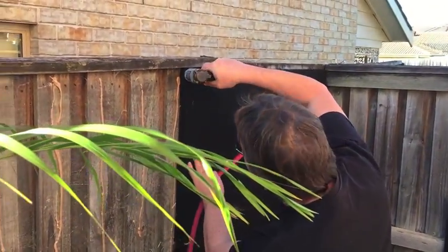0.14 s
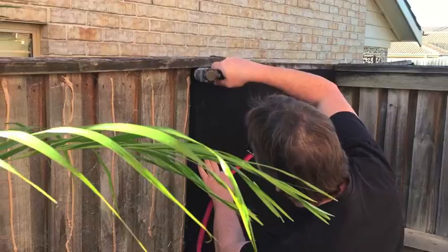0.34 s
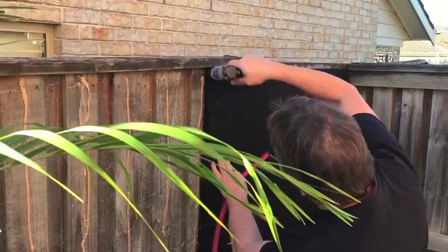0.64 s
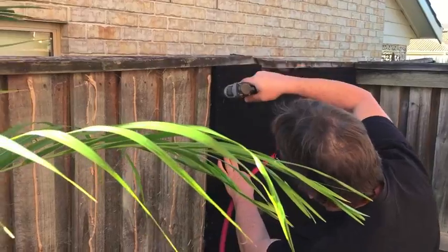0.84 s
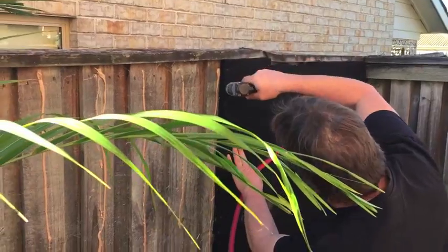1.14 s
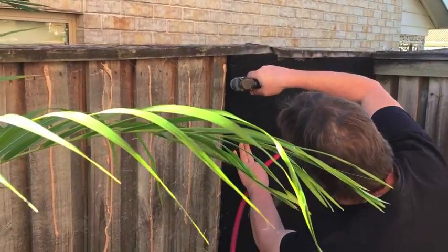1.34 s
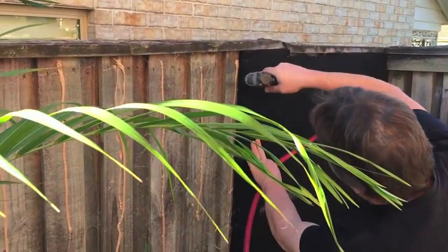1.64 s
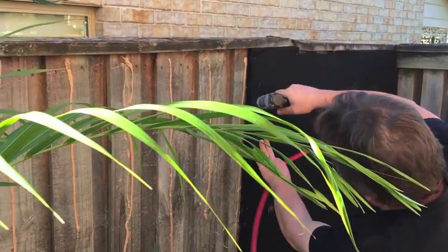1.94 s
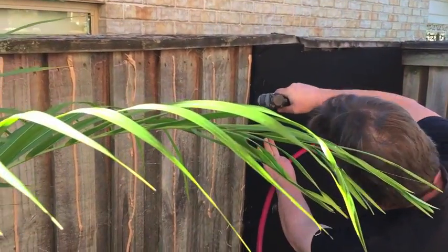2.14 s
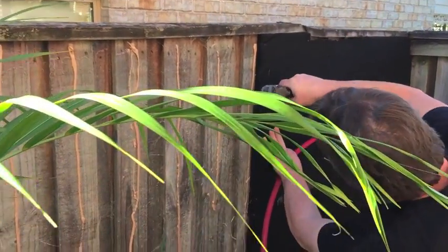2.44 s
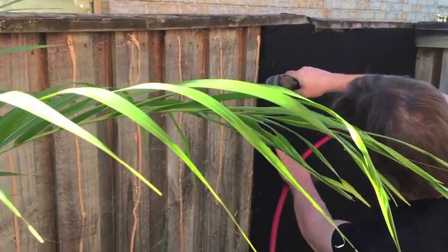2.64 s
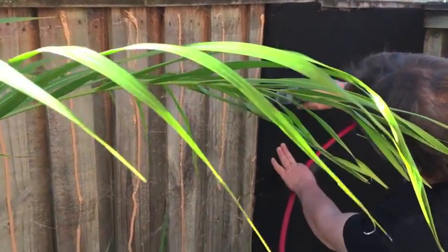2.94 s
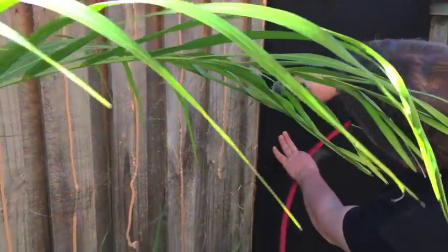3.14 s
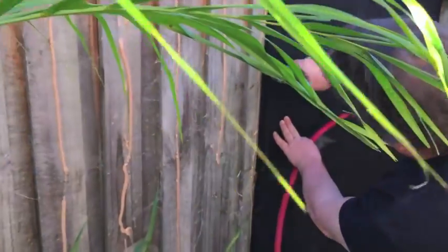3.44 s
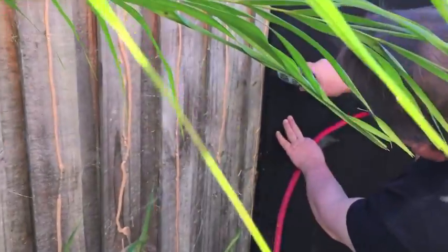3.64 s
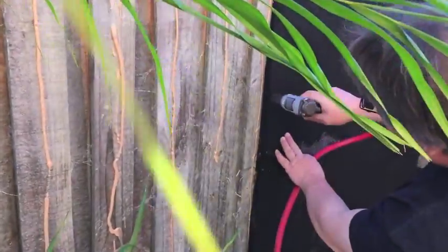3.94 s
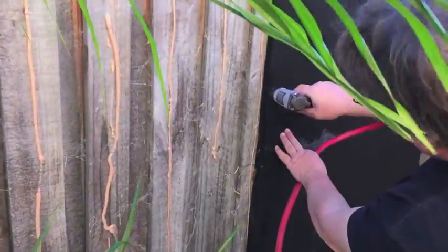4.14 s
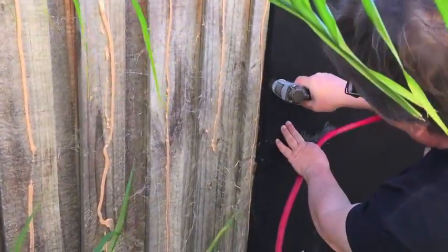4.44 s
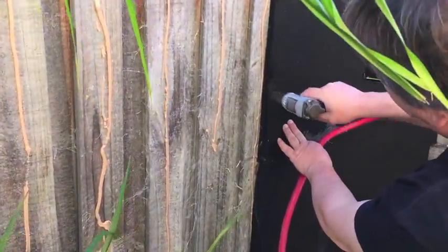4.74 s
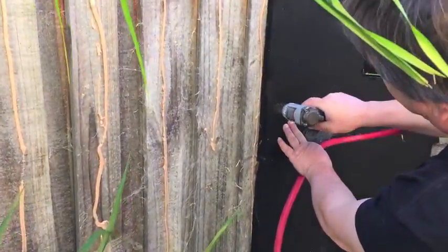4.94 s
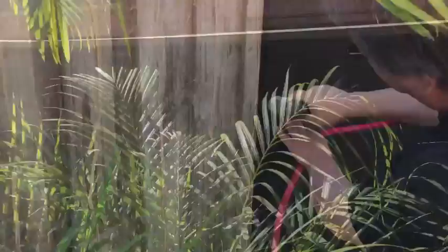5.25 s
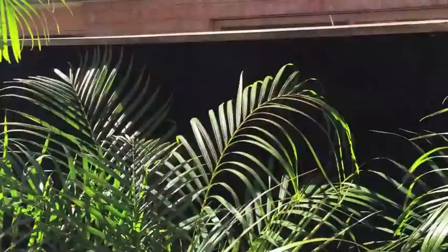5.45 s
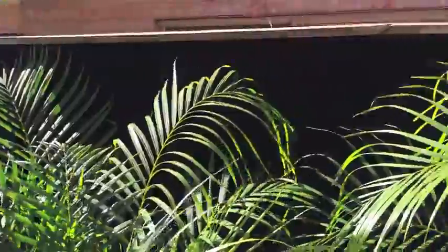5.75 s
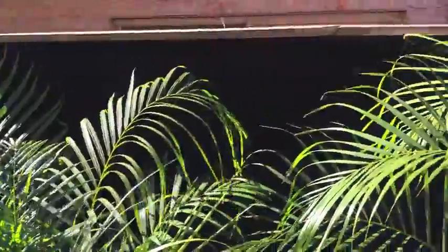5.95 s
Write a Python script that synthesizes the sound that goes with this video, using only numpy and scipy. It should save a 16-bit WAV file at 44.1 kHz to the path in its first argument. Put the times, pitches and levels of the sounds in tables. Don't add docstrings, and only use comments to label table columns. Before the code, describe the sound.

Five hard staple-gun shots dominate, each a double event: a cracking blow that rings the planks, then, a fifth of a second later, a clattering burst of released air. Between them are quiet scuffs, taps and leaf rustles, with low traffic behind. Short echoes return from fences and walls. After the last shot come small metal chinks, a short low motor chug and faint bird notes. Near microphone, outdoors.

```python
import sys
import numpy as np
from scipy import signal
from scipy.io import wavfile
from scipy.ndimage import uniform_filter1d, map_coordinates

SR = 44100
rng = np.random.default_rng(int(sys.argv[2]) if len(sys.argv) > 2 else 0)


def convert_level_to_amplitude(level_db):
    exponent = np.asarray(level_db, float) / 20
    return 10 ** exponent


def store_pcm(level_fs):
    pcm = np.round(np.clip(level_fs, -1, 1) * 32767).astype(np.int16)
    wavfile.write(sys.argv[1], SR, np.atleast_2d(pcm).T)


N = 268965


def evened(x):
    return x / np.sqrt(np.mean(x ** 2) + 1e-20)


def smooth_noise(count, size):
    return evened(uniform_filter1d(rng.standard_normal(count), size=size))


def read(points, hz):
    f, value = np.transpose(points)
    return np.interp(np.log(hz + 1), np.log(f + 1), value)


def level(points):
    s, db = np.transpose(points)
    return convert_level_to_amplitude(np.interp(np.arange(N) / SR, s, db))


def add(mix, s, sound):
    part = mix[round(s * SR):][:len(sound)]
    part += sound[:len(part)]


def above(x, hz):
    return signal.sosfilt(signal.butter(N=4, Wn=hz / (SR / 2), btype="high", output="sos"), x)


def swell(count, rise, t60, hold=0.):
    t = np.arange(count) / SR
    return (1 - np.exp(-t / rise)) * convert_level_to_amplitude(-60 * np.maximum(t - hold, 0) / t60)


def hiss(colour, count, t60=None, patchy_db=0., size=128):
    frames, hz = 4 * count // size + 5, np.fft.rfftfreq(size, 1 / SR)
    a, b, patches = rng.standard_normal((frames, len(hz), 3)).T
    patches = uniform_filter1d(patches, size=5, axis=0)
    patches = evened(uniform_filter1d(patches, size=7, axis=1))
    shape = convert_level_to_amplitude(read(colour, hz))[:, None]
    z = (a + 1j * b) * shape * convert_level_to_amplitude(patchy_db * patches)

    def to_sound(v):
        return signal.istft(v, nperseg=size, noverlap=3 * size // 4)[1][:count]

    rms = np.std(to_sound(z))
    if t60:
        t = np.arange(frames) * size / 4 / SR
        z = z * convert_level_to_amplitude(-60 * t / read(t60, hz)[:, None])
    return to_sound(z) / rms


def ring(modes, t60, rough, hold=0., count=12000):
    t, out = np.arange(count) / SR, 0
    clear = np.exp(-(t / .028) ** 2)
    for hz, width, db in modes:
        r = np.exp(-np.pi * np.clip(2 * width, 90, 400) / SR)
        a, b = signal.lfilter([1], [1, -2 * r, r * r], rng.standard_normal((2, 2 * count)))[:, count:]
        waver = clear + rough * (1.12 - clear) * (a + .4j * b) / np.std(a)
        tone = waver * np.exp(2j * np.pi * (hz * t + rng.random()))
        fall = convert_level_to_amplitude(db - 60 * np.maximum(t - hold, 0) / read(t60, hz))
        out = out + fall * np.sqrt(np.clip(width, 30, 250)) * tone.real
    return out / np.std(out[:700])


def thump(hz, cycles, count=8000):
    u = np.arange(count) / SR * hz
    return np.sqrt(2) * np.sin(2 * np.pi * u) * (1 - np.exp(-u / 0.55)) * np.exp(-u / cycles)


def pop(count=2500):
    t = np.arange(count) / SR
    clack = np.exp(-t / 0.00027) * np.sin(2 * np.pi * 950 * t) * 0.19
    return clack - np.exp(-t / 0.00089) * np.sin(2 * np.pi * 150 * t)


def touch(s, db, hz, width, t60, rise):
    share = width / hz
    colour = [(hz / (1 + 2.5 * share), -30), (hz / (1 + .6 * share), -4), (hz, 0),
              (hz + width / 2, -4), (hz + 1.5 * width, -30), (8 * hz, -75)]
    return s, convert_level_to_amplitude(db) * hiss(colour, count=6000, patchy_db=1, size=256) * swell(6000, rise, t60)


def touches(mix, rows, share, t60, rise):
    for s, db, hz in rows:
        add(mix, *touch(s, db, hz, share * hz, t60, rise))


def chink(s, db, hz, t60, rise):
    t = np.arange(3000) / SR
    return s, convert_level_to_amplitude(db + 2) * np.sin(2 * np.pi * hz * t) * swell(3000, rise, t60, 0.003)


# pitch_hz, level_db
TRAFFIC_COLOUR = [(12, -51.5), (20, -22), (41, -3), (92, 4), (157, -5), (198, -9.5), (248, -13),
                  (433, -23.5), (528, -30), (600, -20.5), (780, -46), (1320, -120)]
AIR_COLOUR = [(180, -40.5), (300, -6.5), (511, -12), (565, -16), (885, -9), (1060, -10.5), (1690, -12.5),
              (16000, -28.5)]
LEAF_COLOUR = [(2500, -32), (6000, -5), (9000, -1.5), (13000, -5.5), (16000, -3.5)]
# time_s, level_db
TRAFFIC_LEVEL = [
    (0, -63.5),
    (.5, -59),
    (2., -62),
    (3., -60),
    (4.3, -59),
    (4.9, -64.5),
    (5.2, -52),
    (5.45, -72),
    (5.6, -66.5),
    (6.1, -62.5),
]
# time_s, level_db
LEAF_STIR = [(0, -84.5), (.4, -81), (.9, -86.5), (1.4, -80), (2.1, -85), (2.5, -79.5), (2.9, -69.5),
             (3.5, -78), (4.1, -72), (4.4, -73.5), (4.95, -80), (5.4, -81), (6.1, -80)]
# middle_s, length_s, level_db
FROND_SWISHES = [
    (3.22, 0.086, -66),
    (3.306, .1, -70),
    (4.134, 0.038, -54.5),
    (4.22, 0.17, -59),
]


def background():
    stir = level(LEAF_STIR)
    rustle, air = stir.copy(), convert_level_to_amplitude(-70.5) + convert_level_to_amplitude(5) * stir
    for s, length, db in FROND_SWISHES:
        add(rustle, s - length / 2, convert_level_to_amplitude(db) * np.hanning(round(length * SR)))
    rumble = level(TRAFFIC_LEVEL) * convert_level_to_amplitude(3.5) * hiss(TRAFFIC_COLOUR, count=N, patchy_db=-0.2, size=2048)
    breeze = air * convert_level_to_amplitude(-5.0) * hiss(AIR_COLOUR, count=N, patchy_db=1.5, size=512)
    leaves = rustle * convert_level_to_amplitude(-2.5) * hiss(LEAF_COLOUR, count=N, patchy_db=5.5, size=256)
    return rumble + breeze + leaves


# start_s, level_db, pitch_hz
GRIT_TICKS = [(.162, -60, 2600), (.18, -52, 1500), (.181, -60, 4200), (.238, -66, 3000), (0.306, -68, 1500),
              (.337, -55.5, 2100), (.366, -60, 2900), (4.277, -52, 3500), (5.0726, -52, 1850),
              (5.0778, -44, 1750), (5.082, -52, 1400), (5.088, -54, 8400), (5.096, -55, 3940)]


def grit(mix):
    touches(mix, GRIT_TICKS, share=0.65, t60=0.016, rise=.0004)


# start_s, level_db, pitch_hz
HAND_SCUFFS = [(.163, -62, 3808), (.175, -54, 1290), (.305, -62, 1308), (.33, -59.5, 1588),
               (1.0196, -58, 3500), (1.3111, -62, 900), (1.4317, -60.5, 3220), (2.2998, -57.5, 1092),
               (3.1092, -62, 3502), (3.384, -60.5, 1100), (3.492, -55, 2986), (4.298, -57, 1157),
               (4.362, -60, 1400), (4.429, -63.5, 3377), (5.194, -62, 1570), (5.208, -58, 4330),
               (5.418, -62, 4305), (4.245, -61.5, 2470)]


def scuffs(mix):
    touches(mix, HAND_SCUFFS, share=0.7, t60=0.096, rise=0.0023)


# start_s, level_db, pitch_hz
STRUCK_NOTES = [(.177, -57, 1490), (.179, -58, 1050), (.332, -62, 1310), (.334, -59.5, 2040),
                (2.3, -65, 1110), (2.302, -64.5, 2140), (4.3, -61, 1400), (4.303, -49.5, 379),
                (4.357, -61.5, 2950), (4.362, -68, 1367), (4.368, -62, 420), (4.43, -64, 3200),
                (4.431, -64, 3740), (5.075, -48, 1253), (5.076, -48, 1610), (5.075, -45.5, 2010),
                (5.076, -54, 3670), (5.076, -51, 4270), (5.208, -64, 4700), (5.207, -62, 2950),
                (5.194, -63, 1260), (5.258, -49, 650), (5.28, -50, 1280)]


def struck_notes(mix):
    for row in STRUCK_NOTES:
        add(mix, *chink(*row, t60=0.054, rise=.0015))


# start_s, level_db, pitch_hz
LIGHT_TICKS = [
    (.36, -61, 3720),
    (3.953, -49.5, 6400),
    (3.9535, -46, 2800),
    (4.162, -54, 1993),
    (4.276, -50.5, 5600),
    (4.2765, -50, 2670),
    (4.269, -59.5, 3000),
    (4.972, -63, 6800),
    (4.9945, -54, 5630),
    (4.995, -51.5, 2710),
]


def light_ticks(mix):
    touches(mix, LIGHT_TICKS, share=0.23, t60=0.018, rise=0.000515)


# start_s, level_db, pitch_hz
TRIGGER_CLICKS = [
    (.472, -44.5, 9850),
    (.478, -44, 9000),
    (1.4908, -33, 11000),
    (1.495, -32, 6945),
    (2.5095, -39, 8860),
    (2.515, -37, 7013),
    (3.5075, -40.5, 2486),
    (3.511, -40, 5960),
    (4.5575, -38.5, 8950),
    (4.56, -41, 5500),
]


def trigger(mix):
    touches(mix, TRIGGER_CLICKS, share=1.5, t60=0.016, rise=.0003)


# pitch_hz, level_db
PUFF_COLOUR = [(120, -33.5), (200, -1.5), (1710, -13.5), (2860, -3), (4770, -10.5), (6280, 0.5), (7970, -7),
               (11500, -6), (16000, -7)]
LEAK_COLOUR = [(1500, -30), (4000, -4.5), (7000, 1.5), (11000, -7.5), (16000, -15)]
# valve_opens_s, puff_db, nose_burst_db
VALVE_OPENINGS = [
    (0.4829, -23.5, -24.5),
    (1.4978, -24, -29),
    (2.517, -23, -24.5),
    (3.5123, -22.5, -24),
    (4.5629, -22, -24),
]


def valve(s, puff_db, nose_db, strike_s):
    out = np.zeros(4000)
    add(out, .002, convert_level_to_amplitude(puff_db - 12) * hiss(LEAK_COLOUR, count=400) * swell(400, 0.0022, 0.038))
    puff = swell(1500, .0012, .03, .0045) + convert_level_to_amplitude(-13) * swell(1500, .003, .2)
    add(out, .005, convert_level_to_amplitude(puff_db + 2.5) * above(hiss(PUFF_COLOUR, count=1500, patchy_db=0.5), 880) * puff)
    add(out, .008, convert_level_to_amplitude(puff_db - 0.5) * pop())
    burst = hiss(LEAF_COLOUR, count=2500) * swell(2500, .0004, 0.059, .003)
    add(out, 0.0044 + strike_s - s, convert_level_to_amplitude(nose_db) * burst)
    return s - .005, out


# start_s, ring_db, crack_db, crash_db
SHOT_BLOWS = [
    (0.498, -8, -8.5, -7),
    (1.5113, -12, -8, -6),
    (2.5303, -9.5, -7, -5),
    (3.527, -7, -7.5, -3.5),
    (4.578, -10, -7.5, -5.5),
]
# pitch_hz, level_db
PLANK_MODES = [
    [(400, -15), (624, -14.5), (1050, -8), (1255, -2.5), (1370, 1.5), (1710, -9.5), (1850, -11),
     (1990, -5.5), (2380, -12.5), (2650, -9), (2920, -11.5), (3300, -12), (3550, -2.5), (4050, -5.5)],
    [(316, -0.5), (615, 1), (935, -5), (1250, -0.5), (1480, 2), (1890, 2), (2330, -7), (2650, -8),
     (2960, -9), (3300, -14.5), (3600, -15), (3910, -12.5)],
    [(355, -1.5), (644, -1), (918, -1.5), (1153, 0), (1260, -3.5), (1560, -6), (1960, -9.5), (2230, -8),
     (2570, -5.5), (2850, -5.5), (3270, -8.5), (3450, -3), (3990, -6), (4150, -7.5)],
    [(363, -3), (662, -7.5), (1140, -5), (1340, 2.5), (1550, -4), (2030, -11.5), (2210, -9), (2700, -11.5),
     (2950, -13), (3380, -14.5), (3630, -9.5), (3960, -10), (4270, -12)],
    [(199.3, -2), (299.3, -4.5), (460, -5), (921, -2.5), (1135, -5.5), (1360, 0), (1637, -7), (1950, -6),
     (2240, -6), (2700, -8), (3040, -16.5), (3320, -9), (3580, -4), (4250, -8)],
]
# pitch_hz, t60_s
WOOD_FALL = [(200, 0.06), (330, .06), (620, 0.035), (1300, .08), (2500, 0.058), (4000, 0.06)]
# pitch_hz, level_db
CRASH_COLOUR = [(100, -14.5), (300, -6), (1000, -0.5), (2200, -5.5), (3500, -13), (5000, -15.5),
                (9000, -18.5), (12700, -22.5), (16000, -29)]
CRACK_COLOUR = [(800, -19.5), (3000, -3), (8000, -6), (16000, -14)]
# pitch_hz, t60_s
CRASH_FALL = [(100, 0.22), (1000, 0.14), (4000, 0.12), (9000, 0.044), (15000, 0.05)]
# pitch_hz, width_hz, level_db
BLADE_MODES = [(5500, 930, -3), (6870, 260, -1), (8630, 420, -4.5), (11000, 290, -11), (13260, 350, -5.5)]
# pitch_hz, t60_s
BLADE_FALL = [(5000, .014), (15000, .012)]


def crash_noise(patchy_db, rise, t60):
    return hiss(CRASH_COLOUR, count=9000, t60=CRASH_FALL, patchy_db=patchy_db) * swell(9000, rise, t60)


def shot(s, ring_db, crack_db, crash_db, plank):
    out = np.zeros(16000)
    press_s, let_go_db = .016, -7.5
    ringing_on = convert_level_to_amplitude(let_go_db) * swell(9000, 0.0013, 5.5)
    press = ringing_on + (1 - convert_level_to_amplitude(let_go_db)) * swell(9000, 0.003, 0.022, press_s)
    modes = [(hz, 58, db) for hz, db in plank]
    add(out, 0, convert_level_to_amplitude(ring_db + 0.5) * ring(modes, WOOD_FALL, 0.55, press_s, count=9000) * press)
    for after, db in ((0, -4), (.009, -7.5)):
        add(out, after, convert_level_to_amplitude(crash_db + db - 1.0) * above(crash_noise(3.0, 0.0004, 4.0), 150))
    add(out, 0, convert_level_to_amplitude(-36) * thump(84, 3.3))
    add(out, 0, convert_level_to_amplitude(ring_db - 17.0) * thump(195, 2.4))
    snap = swell(900, .0001, .012, .0008) + convert_level_to_amplitude(-12) * swell(900, .0005, .05)
    for after, db in ((.0026, 3.5), (.0062, -1.5)):
        add(out, after, convert_level_to_amplitude(crack_db + db) * hiss(CRACK_COLOUR, count=900) * snap)
        add(out, after, convert_level_to_amplitude(crack_db + db - 17.5) * ring(BLADE_MODES, BLADE_FALL, 0.32, count=1000))
    return s, out


# pitch_hz, level_db, t60_s
LINGER_MODES = [
    [(934, -2.5, 0.21), (1303, -0.5, 0.33), (1890, -14, 0.12), (2363, -11, 0.24), (3569, -3.5, 0.18),
     (4000, -10, 0.3)],
    [(930, -1.5, 0.16), (1491, -0.5, 0.22), (1860, 0, 0.16), (2320, -8, 0.24), (2510, -6, 0.17),
     (3620, -11.5, 0.2)],
    [(645, -7, 0.19), (904, -4.5, 0.074), (1593, -0.5, 0.086), (1992, -20.5, 0.34), (3494, 0.5, 0.07),
     (4172, -11.5, 0.15)],
    [(335, -11.5, 0.22), (980, -10.5, 0.16), (1340, -0.5, 0.082), (1922, -11.5, 0.16), (2751, -21.5, 0.16),
     (3908, -15.5, 0.13)],
    [(1273, 2, 0.075), (1550, -17.5, 0.25), (2300, -18.5, 0.17), (2697, -38.5, 5.0), (3591, -33, 5.0),
     (4040, -17.5, 0.16)],
]
LINGER_LEVEL = [-26, -30.5, -25, -24.5, -18.5]


def linger(s, level_db, modes):
    t, out = np.arange(9000) / SR, 0
    for hz, db, t60 in modes:
        beat = 1 + .6 * np.sin(2 * np.pi * (rng.uniform(15, 40) * t + rng.random()))
        tone = np.sin(2 * np.pi * (hz * t + rng.random()))
        out = out + convert_level_to_amplitude(db) * beat * tone * swell(9000, 0.0058, np.clip(t60, .05, .18), hold=0.031)
    return s, convert_level_to_amplitude(level_db) * out


# exhaust_opens_s, knock_db, leak_db, blast_db
EXHAUST_RELEASES = [
    (.677, -20.5, -46, -22.5),
    (1.6866, -20.5, -44.5, -21.5),
    (2.685, -21.5, -49, -22.5),
    (3.672, -21.5, -48.5, -22.5),
    (4.739, -21, -47.5, -22),
]
# pitch_hz, level_db
GUN_BODY = [
    [(301, -0.5), (990, -2), (1350, -3.5), (1680, -2.5), (2070, -8), (2620, 0.5), (2850, -3.5),
     (3210, -17.5), (3810, -2)],
    [(307, -4), (650, -11.5), (942, -7.5), (1380, -4.5), (1680, -1.5), (1850, -2), (2380, -13),
     (2620, -4.5), (2860, -6), (3650, -6)],
    [(307, -3.5), (840, -18), (1010, -2), (1470, -11.5), (1850, 3), (2480, -5), (2760, 1.5), (3340, -11),
     (3700, -8)],
    [(355, -4.5), (985, -3.5), (1330, -6.5), (1660, -5.5), (1860, -11), (2450, -20), (2620, -10.5),
     (2910, -12), (3570, -7)],
    [(328, -4), (985, -3.5), (1260, -7), (1430, -8.5), (1610, -5), (2370, -17), (2560, -11), (2910, -16),
     (3510, -9.5)],
]
# pitch_hz, t60_s
BODY_FALL = [(300, 0.071), (1000, 0.086), (1800, 0.085), (3600, 0.071)]
# pitch_hz, level_db
EXHAUST_COLOUR = [(300, -19.5), (1200, -6.5), (2200, -12), (2700, -4.5), (3400, -6.5), (5500, -6.5),
                  (8000, -6.5), (10500, -7), (12100, -4), (16000, -8.5)]


def release(s, knock_db, leak_db, blast_db, grip):
    out = np.zeros(14000)
    home_s, drain_s = .0243, 0.11
    add(out, .004, convert_level_to_amplitude(leak_db) * hiss(LEAK_COLOUR, count=750) * signal.windows.tukey(750, .7))
    drain = swell(12000, 0.0038, 0.27) * swell(12000, .001, .12, drain_s)
    blow = swell(12000, 0.0012, 0.042, home_s + 0.0066) + convert_level_to_amplitude(-3) * drain
    add(out, .02, convert_level_to_amplitude(blast_db) * hiss(EXHAUST_COLOUR, count=12000, patchy_db=2.5) * blow)
    add(out, .02, convert_level_to_amplitude(-24.5) * hiss(EXHAUST_COLOUR, count=600) * swell(600, 0.00053, .02))
    add(out, .02, convert_level_to_amplitude(-10.5) * pop())
    add(out, .0312, convert_level_to_amplitude(-3.5) * pop())
    held = [(hz, 53, db) for hz, db in grip]
    knock = ring(held, BODY_FALL, 0.95, 0.0042) * swell(12000, 0.00095, 1.6)
    add(out, .02 + home_s, convert_level_to_amplitude(knock_db + 1.5) * knock)
    add(out, .02 + home_s, convert_level_to_amplitude(knock_db - 2.5) * above(crash_noise(0.0, 0.00011, 11.0), 196.0))
    for after in (.001, .0045):
        bounce = above(hiss(CRASH_COLOUR, count=500), 590) * swell(500, .0002, .012)
        add(out, 0.023 + home_s + after, convert_level_to_amplitude(knock_db) * bounce)
    add(out, .018, convert_level_to_amplitude(-33.5) * thump(77.9, 3.5))
    return s - .02, out


# pitch_hz, width_hz, level_db
PORT_WHISTLES = [
    [(5600, 29, -5), (11200, 25, -2.5), (12800, 29, 3), (13800, 43, -4)],
    [(6210, 34, -6.5), (11700, 37, 0), (12800, 62, -1), (14400, 36, -1.5)],
    [(6960, 45, 0), (10900, 35, -2), (12900, 130, 5), (14200, 110, 2)],
    [(5660, 25, -1), (9260, 34, -2), (12200, 45, 5), (13700, 62, -6)],
    [(7940, 28, -3), (11800, 31, -3), (12600, 28, -3), (14600, 84, -10)],
]


def jet(s, blast_db, peaks):
    t, out = np.arange(5000) / SR, 0
    for hz, width, db in peaks:
        r = np.exp(-np.pi * np.clip(width, 25, 200) / SR)
        a, b = signal.lfilter([1], [1, -r], rng.standard_normal((2, 10000)))[:, 5000:]
        fuzz = .6 + 0.89 * (a + 1j * b) / np.std(a)
        out = out + convert_level_to_amplitude(db) * (fuzz * np.exp(2j * np.pi * (hz * t + rng.random()))).real
    return s, convert_level_to_amplitude(blast_db - 12) * out * swell(5000, .006, .05, hold=.034)


# start_s, level_db, pitch_hz
DRY_SNAPS = [
    (5.5788, -50, 3300),
    (6.8, -48, 6900),
    (6.5, -44, 12100),
    (5.592, -54, 1300),
    (4.16, -52, 9400),
    (4.3557, -58, 5100),
    (3.953, -53, 4700),
    (1.489, -50, 1800),
]


def snaps(mix):
    touches(mix, DRY_SNAPS, share=1.1, t60=0.018, rise=0.00074)


# start_s, level_db, pitch_hz
HOSE_BUMPS = [
    (2.305, -49.5, 292),
    (4.307, -54, 388),
    (4.365, -55, 396),
    (4.42, -60, 400),
    (5.09, -50, 555),
    (5.25, -58, 620),
]


def hose(mix):
    touches(mix, HOSE_BUMPS, share=0.65, t60=0.11, rise=.008)


# delay_s, level_db, pitch_hz, width_hz, t60_s
SWITCH_PARTS = [
    (0.0011, -52, 1300, 1100, 0.24),
    (0.0016, -60, 4800, 2500, 0.35),
    (0.006, -44, 1560, 860, 0.058),
    (0.0055, -53.5, 3900, 630, 0.14),
    (0.0045, -55, 6100, 1200, 0.12),
    (0.0033, -63, 8400, 1400, 0.2),
    (.004, -62, 14000, 5500, 0.054),
    (0.0025, -56, 2850, 240, 0.21),
]


def pressure_switch(mix):
    seep = np.hanning(round(0.024 * SR))
    add(mix, 5.056, convert_level_to_amplitude(-61) * hiss(LEAF_COLOUR, count=len(seep), patchy_db=5) * seep)
    for delay, db, hz, width, t60 in SWITCH_PARTS:
        add(mix, *touch(5.071 + delay, db, hz, width, t60, rise=.0013))


# start_s, level_db, pitch_hz
METAL_CHINKS = [
    (5.227, -49, 1280),
    (5.228, -44.5, 1915),
    (5.322, -46, 2100),
    (5.364, -46, 1945),
    (5.385, -46, 1955),
    (5.854, -60.5, 4000),
    (5.135, -64, 4260),
    (5.1, -59.5, 6310),
    (5.078, -44, 1780),
]


def metal_chinks(mix):
    for row in METAL_CHINKS:
        add(mix, *chink(*row, t60=0.043, rise=.0015))


# time_s, shaft_hz, level_db
MOTOR_RUN = [
    (5.171, 50.37, -63),
    (5.228, 49.66, -47.5),
    (5.267, 50.37, -44.5),
    (5.302, 48.2, -41),
    (5.356, 47.8, -42),
    (5.509, 48.13, -47.5),
    (5.552, 48, -53.5),
    (5.586, 48.3, -61.5),
    (5.6, 47.4, -74),
]
# multiple_of_shaft, level_db
SHAFT_TONES = [(1, -5.5), (2, -1), (3, -14), (4, -4), (5, -12), (6, -17), (7, -8.5), (8, -18), (9, -14.5),
               (10, -18)]
# pitch_hz, level_db
CHUG_COLOUR = [(260, -20), (450, -4), (480, -18), (571, 2), (800, -6), (900, -2), (1100, -11), (1500, -0.5),
               (1700, -4), (1930, 2), (2100, -8), (2300, -7), (2550, -16), (2850, -12.5), (3200, -22),
               (5200, -35), (8800, -120)]


def compressor():
    s, *columns = np.transpose(MOTOR_RUN)
    t = np.arange(s[0], s[-1], 1 / SR)
    hz, db = (np.interp(t, s, c) for c in columns)
    turns = np.cumsum(hz * (1 + .005 * smooth_noise(len(t), 1500))) / SR

    def tone(k):
        return np.cos(2 * np.pi * (k * turns + rng.random()))

    low = sum(convert_level_to_amplitude(d + 3 * smooth_noise(len(t), 1400)) * tone(k) for k, d in SHAFT_TONES)
    scatter = 2.5 * rng.standard_normal(100)
    high = sum(convert_level_to_amplitude(read(CHUG_COLOUR, k * hz.mean()) + scatter[k]) * tone(k) for k in range(11, 100))
    pulse = 0.33 + np.exp(-(turns % 1) / 0.43)
    rattle = hiss(CHUG_COLOUR, count=len(t), patchy_db=3.0, size=256) * pulse
    low, high = (v * convert_level_to_amplitude(2.2 * smooth_noise(len(t), 1200)) for v in (low, high))
    mix = evened(low) + convert_level_to_amplitude(-9.5) * evened(high) + convert_level_to_amplitude(-12) * evened(rattle)
    return s[0], convert_level_to_amplitude(db) * evened(mix) * signal.windows.tukey(len(t), .1)


# start_s, level_db, pitch_hz, length_cycles
LOW_BUMPS = [
    (5.257, -40, 59, .63),
    (5.259, -29.5, 130, 2.04),
    (5.307, -34, 110, 0.99),
    (5.923, -26.5, 55.9, 0.55),
]


def low_bumps(mix):
    for s, db, hz, cycles in LOW_BUMPS:
        add(mix, s, convert_level_to_amplitude(db) * thump(hz, cycles))


# start_s, length_s, pitch_hz, level_db
BIRD_NOTES = [
    (5.688, 0.052, 1247, -65),
    (5.766, 0.075, 1243, -71),
    (5.836, .032, 1236, -68),
    (5.858, 0.057, 1411, -64),
    (5.883, 0.033, 1231, -68),
    (5.887, 0.041, 1841, -73),
    (5.94, 0.094, 1211, -79),
]


def whistle(s, length, hz, db):
    t = np.arange(0, length, 1 / SR)
    return s, convert_level_to_amplitude(db + 1.5) * np.sin(2 * np.pi * hz * t) * signal.windows.tukey(len(t), .6)


# pitch_hz, t60_s
YARD_FALL = [(100, 0.66), (260, 0.4), (500, 0.3), (2000, 0.32), (4200, 0.25), (6000, 0.21), (15000, 0.13)]


def yard(x):
    taps = np.zeros(SR // 2)
    at = np.arange(200, len(taps) - 20, 20)
    taps[at + rng.integers(0, 20, len(at))] = rng.choice([-1., 1.], len(at))
    hz, t, z = signal.stft(taps, SR, nperseg=256)
    hz = hz[:, None]
    house = convert_level_to_amplitude(-30 - 1.6 * hz / 1000) * np.exp(-((t - .22) / 0.009) ** 2)
    roofs = convert_level_to_amplitude(-35.5 - 1.3 * hz / 1000) * np.exp(-((t - .26) / 0.048) ** 2)
    far = (house + roofs) * np.clip(hz / 800, 0, 1) ** 2
    tail = signal.istft(z * (convert_level_to_amplitude(-60 * t / read(YARD_FALL, hz)) + far), SR, nperseg=256)[1]
    return signal.fftconvolve(x, tail / np.linalg.norm(tail))[:N]


def scattered(x):
    drift = uniform_filter1d(rng.standard_normal(N), size=400)
    sway = evened(uniform_filter1d(drift, size=400))
    return map_coordinates(x, [np.arange(N) + .0003 * SR * sway], order=3)


def scene():
    near, rest = np.zeros(N), background()
    for contacts in (grit, scuffs, struck_notes, light_ticks, trigger):
        contacts(near)
    for row, plank, air, modes, db in zip(SHOT_BLOWS, PLANK_MODES, VALVE_OPENINGS, LINGER_MODES, LINGER_LEVEL):
        add(near, *valve(*air, row[0]))
        add(near, *shot(*row, plank))
        add(near, *linger(row[0], db, modes))
    for row, grip, peaks in zip(EXHAUST_RELEASES, GUN_BODY, PORT_WHISTLES):
        add(near, *release(*row, grip))
        add(near, *jet(row[0], row[3], peaks))
    for contacts in (snaps, hose, pressure_switch, metal_chinks):
        contacts(near)
    add(rest, *compressor())
    low_bumps(rest)
    for row in BIRD_NOTES:
        add(rest, *whistle(*row))
    turn = np.arange(N) / SR * 2 // 1 % 3
    echoes = sum(yard(near * (turn == k)) for k in range(3))
    return (near + convert_level_to_amplitude(-16.0) * scattered(echoes) + rest)[None]


def low_pass(x):
    return signal.sosfilt(signal.butter(12, 16810, fs=SR, output="sos"), x)


def record(dry):
    ceiling = 0.8
    x = ceiling * np.tanh(dry / ceiling)
    x = signal.lfilter(*signal.butter(N=2, Wn=55 / (SR / 2), btype="high"), x)
    top_cut = signal.firwin(numtaps=401, cutoff=15900, window="blackman", fs=SR)
    x = signal.oaconvolve(x, top_cut[None], "same")
    return low_pass(x)


dry = scene()
out = record(dry)
store_pcm(out)
```